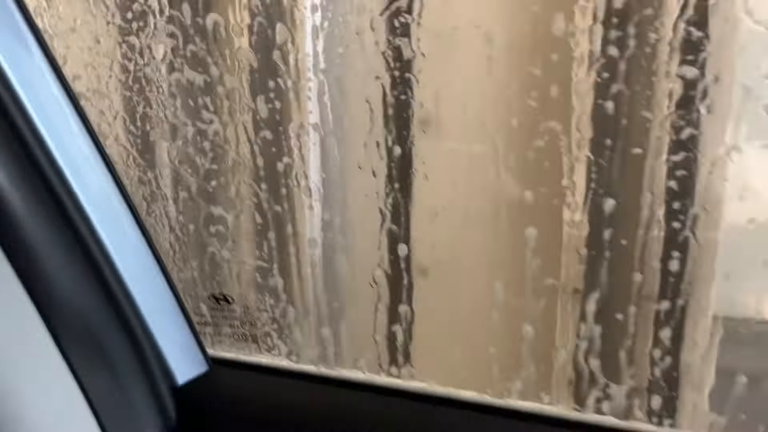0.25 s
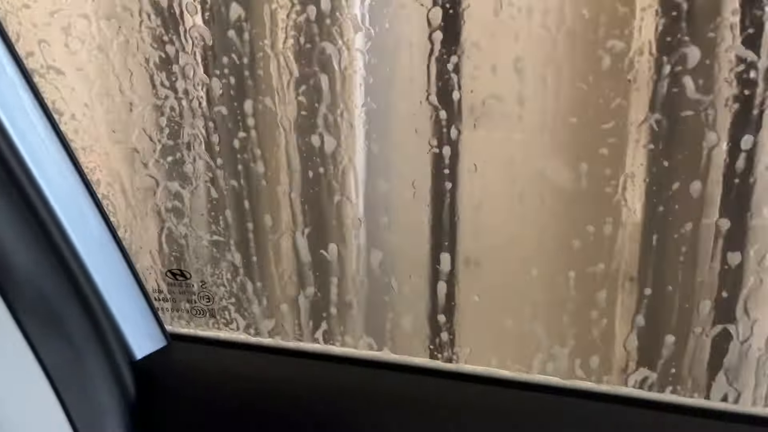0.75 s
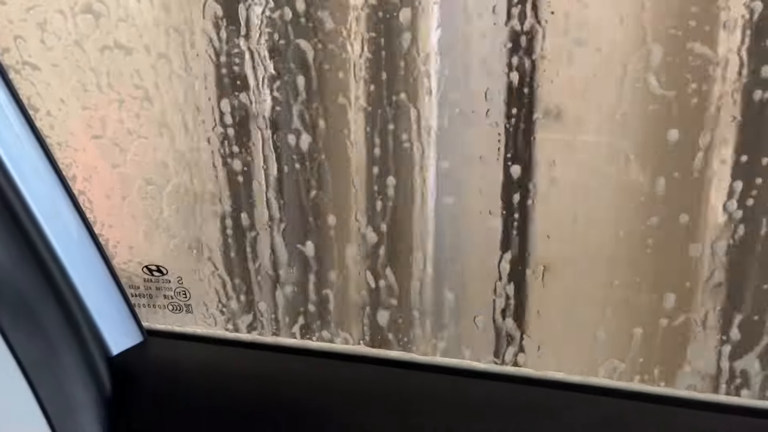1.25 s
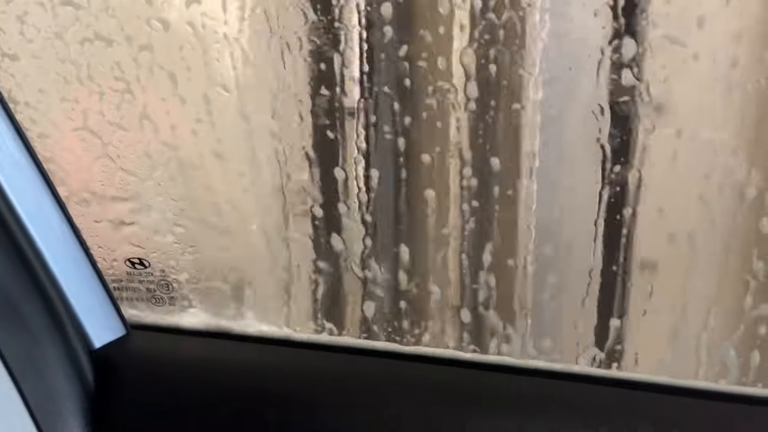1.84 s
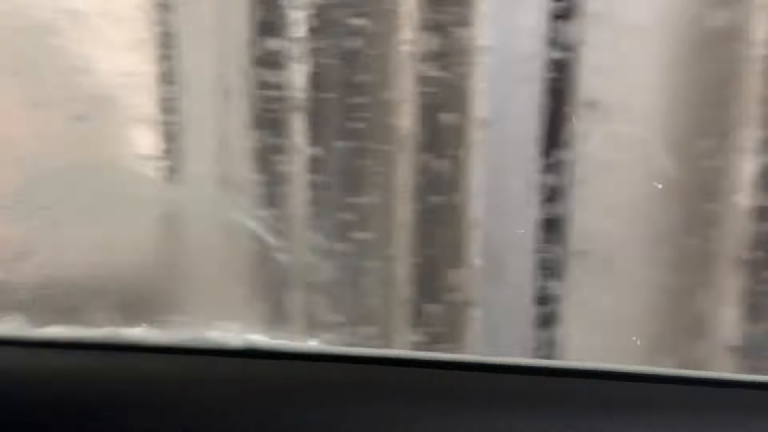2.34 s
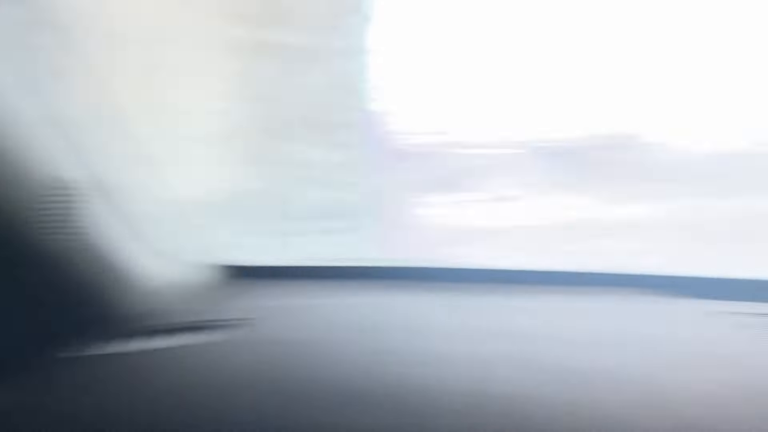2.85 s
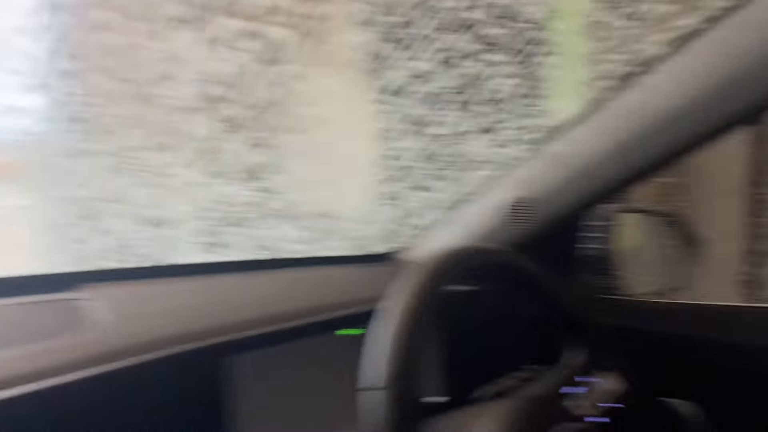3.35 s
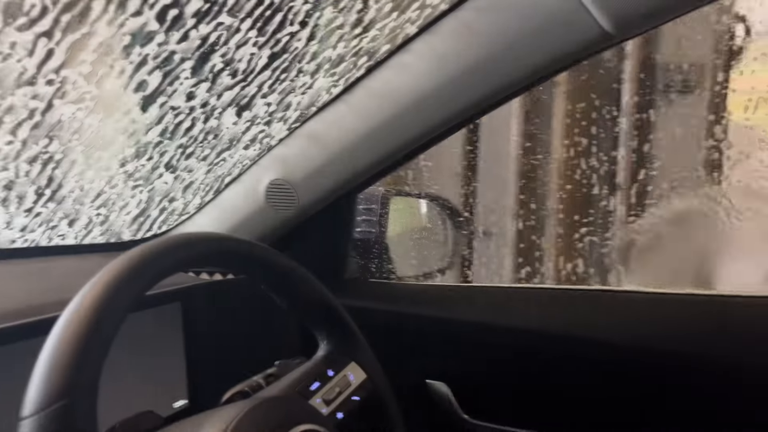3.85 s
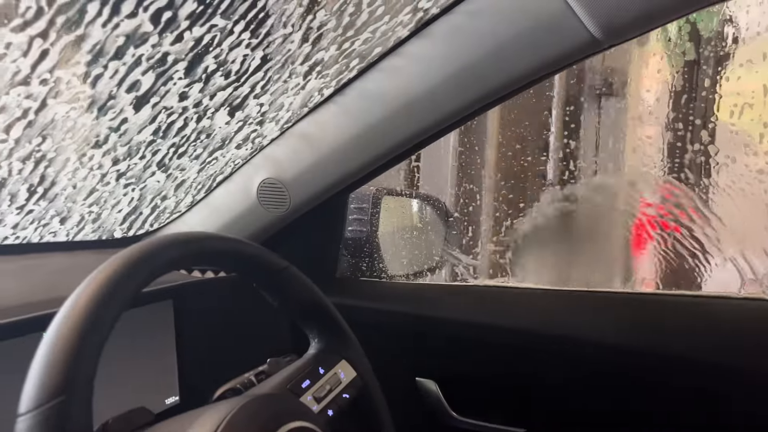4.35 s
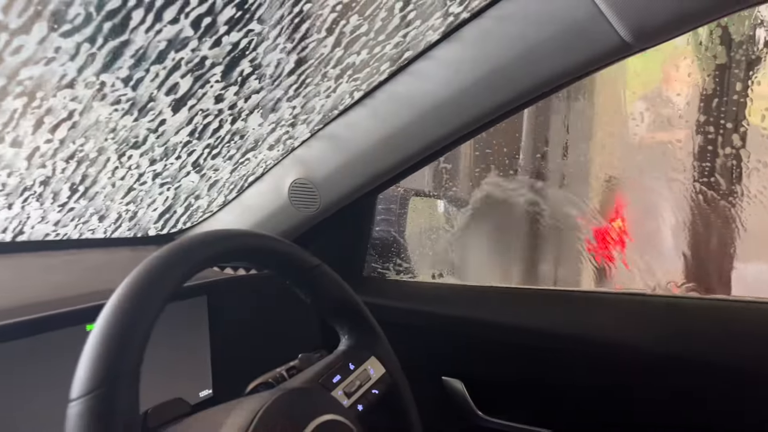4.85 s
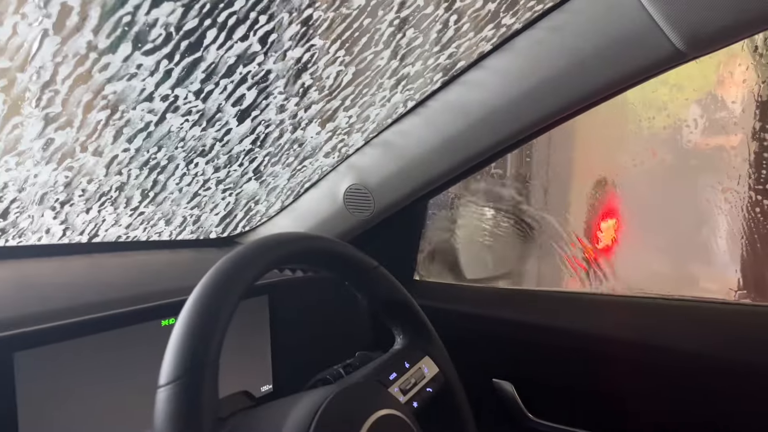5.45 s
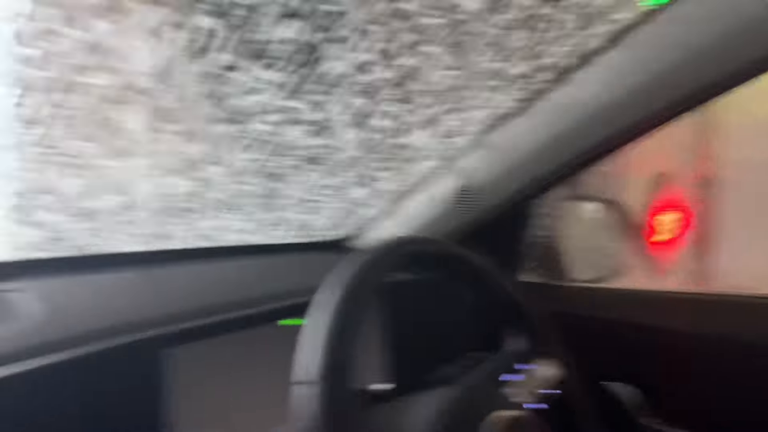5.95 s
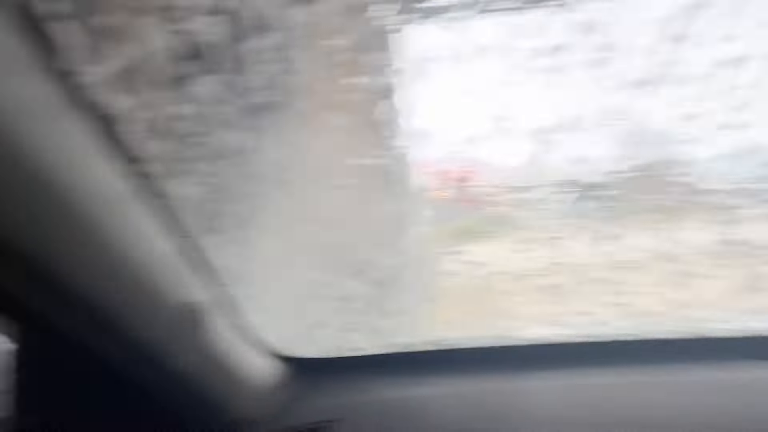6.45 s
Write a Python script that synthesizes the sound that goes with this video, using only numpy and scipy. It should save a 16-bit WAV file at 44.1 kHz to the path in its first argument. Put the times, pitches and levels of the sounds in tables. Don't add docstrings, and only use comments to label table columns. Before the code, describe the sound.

Water jets thud and rumble on car panels over a deep machine hum, spray hisses, a brief rising squeak, then booming hits at the end.

```python
import sys
import numpy as np
from scipy import signal
from scipy.fft import rfft, irfft, next_fast_len
from scipy.io import wavfile
from scipy.ndimage import uniform_filter1d

SR = 44100
rng = np.random.default_rng(int(sys.argv[2]) if len(sys.argv) > 2 else 0)


def voltage_ratio(decibels):
    exponent = np.asarray(decibels, float) / 20
    return 10 ** exponent


def log_audio(samples):
    frames = np.atleast_2d(samples).T
    limited = np.clip(frames, -1, 1)
    pcm = np.round(limited * 32767).astype(np.int16)
    wavfile.write(sys.argv[1], SR, pcm)


N = 294588

PANELS_HZ = [60, 101, 172, 268, 470]


def rms_one(x):
    return x / np.sqrt(np.mean(x ** 2) + 1e-20)


def in_time(rows):
    s, *columns = np.transpose(rows)
    t = np.arange(N) / SR
    return [np.interp(t, s, column) for column in columns]


def drift(rate_hz):
    r = np.exp(-2 * np.pi * rate_hz * 40 / SR)
    noise = rng.standard_normal(N // 40 + 2002)
    slow = signal.lfilter([1], [1, -2 * r, r * r], noise)[2000:]
    return np.interp(np.arange(N) / 40, np.arange(len(slow)), rms_one(slow))


def resonance(x, hz, width_hz):
    r = np.exp(-np.pi * width_hz / SR)
    feed = np.array([1, 0, -1]) * (1 - r * r) / 2
    return signal.lfilter(feed, [1, -2 * r * np.cos(2 * np.pi * hz / SR), r * r], x)


def swells(rows, edge_s):
    s, length, level_db = np.transpose(rows)[:3, :, None]
    t = np.arange(N) / SR
    outside = np.maximum(np.maximum(s - t, t - s - length), 0)
    return voltage_ratio(level_db) * np.exp(-(outside / edge_s) ** 2)


def pitch_shares(hz, at_hz):
    return [np.interp(np.log(hz), np.log(at_hz), one) for one in np.eye(len(at_hz))]


def water(excite, colour, levels_db, at_hz, patchy_db, flicker_hz, count):
    hz, colour_db = np.transpose(colour)
    edges = np.geomspace(hz[0], hz[-1], count + 1)
    together = drift(flicker_hz)
    out = 0
    for k, (low, high) in enumerate(zip(edges, edges[1:])):
        centre_hz = np.sqrt(low * high)
        shares = pitch_shares(centre_hz, at_hz)
        swell_db = sum(share * (level - level.mean()) for share, level in zip(shares, levels_db))
        patch_db = patchy_db * (0.5 * together + drift(flicker_hz))
        gain = voltage_ratio(np.interp(np.log(centre_hz), np.log(hz), colour_db) + swell_db + patch_db)
        band = signal.butter(2, [low, high], "band", fs=SR, output="sos")
        out = out + gain * signal.sosfilt(band, excite[k % 2])
    return rms_one(out)


def panel_levels():
    # time in seconds, level in dB.
    gantry = [(0, -50), (1.1, -46), (1.6, -42), (3.4, -42.5), (3.7, -42.5), (5.3, -41.5), (5.9, -58),
              (6.3, -44), (6.68, -48)]
    # time in seconds, force in dB.
    force = [(0, -40.5), (.5, -41.5), (.9, -41.5), (1.3, -37), (1.5, -33.5), (1.75, -40), (1.95, -43),
             (2.3, -41), (2.7, -39.5), (3.1, -45.5), (3.4, -46), (4.3, -48), (5.3, -49.5), (5.6, -46),
             (6.1, -43), (6.68, -36.5)]
    # time in seconds, rise in dB, panel pitch in Hz.
    surges = [(.03, 12, 128), (.09, 7, 268), (.2, 4, 250), (.41, 6, 104), (.7, 6.5, 430), (1.25, 3, 101),
              (1.3, 1.5, 330), (1.37, 6.5, 290), (1.46, 5, 150), (1.54, 11, 80), (1.59, 6.5, 250),
              (1.75, 5.5, 268), (1.82, 0, 110), (2.03, 16, 131), (2.321, 14, 166), (2.5, 5.5, 165),
              (2.66, 5, 101), (3.54, 6, 101), (3.79, 7, 101), (4.03, 5, 65), (4.5, 3, 268), (4.67, 5, 101),
              (5.04, 11, 101), (5.3, 11, 70), (5.53, 11, 65), (6.2, 5, 360), (6.17, 2.5, 101),
              (6.32, 0, 120)]
    # start in seconds, length in seconds, rise in dB.
    glass_wet = (0.53, 1.65, 9.3)
    surge_s = 0.054

    force_db, = in_time(force)
    force_db = force_db - force_db.mean()
    follow = [0.25, 1.12, 0.44, 0.63]
    panels = np.array(in_time(gantry) + [share * force_db for share in follow])

    wet_start, wet_length, wet_rise_db = glass_wet
    wet_db = wet_rise_db * swells([(wet_start, wet_length, 0)], edge_s=0.1)[0]
    panels[3:] += [0.26 * wet_db, wet_db]

    t = np.arange(N) / SR
    for s, rise_db, hz in surges:
        surge_db = rise_db * np.exp(-((t - s) / surge_s) ** 2)
        panels += np.outer(pitch_shares(hz, PANELS_HZ), surge_db)
    return list(panels)


def drumming():
    # frequency in Hz, level in dB per Hz.
    drum_colour = [(24, -38), (35, -14.5), (50, 0), (100, 5), (140, 2.5), (176, -1.5), (210, -7),
                   (250, -2.5), (320, -7.5), (385, -12.5), (430, -14.5), (470, -26)]
    drum_db, glass_db = -32.5, -53 - 7.5
    glass_hz, glass_width_hz = 429.3, 25.6

    panels = panel_levels()
    noise = rng.standard_normal((2, 2, N))
    body = water(noise, drum_colour, panels, PANELS_HZ, patchy_db=0.5, flicker_hz=9.5, count=24)
    body = signal.sosfilt(signal.butter(6, 480, fs=SR, output="sos"), body)
    glass = resonance(noise[0], glass_hz, glass_width_hz)
    glass = resonance(glass, glass_hz, glass_width_hz)
    return voltage_ratio(drum_db) * body + voltage_ratio(glass_db + panels[-1]) * rms_one(glass)


def cabin(fields):
    out = fields.copy()
    for lag in rng.integers(40, 600, 8):
        out[:, lag:] += 0.09 * drift(1.0)[lag:] * fields[:, :-lag]
    return rms_one(out)


def spray():
    # time in seconds, level in dB, fine mist in dB, coarse drops in dB.
    spray_curve = [(0, -51, -6.5, 0), (.2, -53.5, -7, -1), (.42, -58.5, -8.5, -4), (1.28, -57.5, -11.5, -5),
                   (1.6, -56.5, -5, -5), (1.95, -55, -6.5, -3), (2.38, -51.5, -7, -0.5),
                   (2.52, -43, -8.5, 0), (2.62, -44, -5, -1), (2.86, -47.5, -8.5, 0), (3.02, -52, -6.5, -1),
                   (3.17, -49, -7.5, -2.5), (3.4, -58.5, -8, -4.5), (5.1, -58.5, -7, -4),
                   (5.5, -56.5, -10, -1.5), (5.82, -61, -10, -3.5), (6.42, -52.5, -6.5, -0.5),
                   (6.68, -55, -7, -2)]
    spray_at_hz = [600, 1250, 3800, 11000]
    # frequency in Hz, level in dB per Hz.
    spray_colour = [(400, -5.5), (550, 0), (750, -5), (1000, -9), (1350, -8.5), (1700, -13), (2300, -15.5),
                    (3000, -14.5), (4300, -11.5), (5500, -15), (7000, -19), (8500, -20.5), (11500, -23.5),
                    (16000, -26.5)]
    drops_per_s, spray_db = 3000, -46

    size_db = 3.0 * np.minimum(rng.exponential(1, N), 4)
    drops = voltage_ratio(size_db) * (rng.random(N) < drops_per_s / SR)
    excite = rng.standard_normal((2, 2, N)) * (1 + 0.14 * drops)
    level_db, fine_db, coarse_db = in_time(spray_curve)
    wash_db = 0.61 * level_db + 0.13 * panel_levels()[-1]
    layers = [wash_db, level_db + coarse_db, level_db, level_db + fine_db]
    hiss = water(excite, spray_colour, layers, spray_at_hz, patchy_db=0.9, flicker_hz=10.8, count=20)
    return voltage_ratio(spray_db) * cabin(hiss)


def ports(fields):
    # frequency in Hz, likeness from 0 to 1, right's lead in radians,
    # left over right in dB.
    port_curve = [(30, .98, -.04, 1), (90, 0.95, 0.2, -0.2), (150, 0.93, 0.1, 2.5), (300, 0.85, 0.5, 3.4),
                  (600, 0.41, -0.5, 1), (1000, 0.26, -1, 0.5), (1450, 0.7, -2, -3), (1800, 0, -0.94, 2),
                  (2670, .45, -0.7, 0.5), (4100, 0.29, -1, 2), (5360, 0.42, 2, 3.5), (6480, 0.44, 1, 1),
                  (8600, 0.76, 3.5, -1.5), (11960, 0.83, 6.5, 1.5), (15500, .85, 9.5, -1)]
    hz, alike, lead, pan_db = np.transpose(port_curve)
    size = next_fast_len(N)
    bins = np.arange(size // 2 + 1) * SR / size
    alike = np.interp(bins, hz, np.clip(alike, 0, 1))
    lead = np.interp(bins, hz, lead)
    pan_db = np.interp(bins, hz, pan_db)
    first, second = rfft(fields, size)
    right = alike * np.exp(1j * lead) * first + np.sqrt(1 - alike * alike) * second
    return irfft([first * voltage_ratio(pan_db / 2), right * voltage_ratio(-pan_db / 2)], size)[:, :N]


def pump():
    # multiple of the turning rate, level in dB by the side window,
    # in dB by the windscreen, in dB in mid cabin, left over right in dB.
    orders = [(1, 2.5, -15.5, -13.5, 0), (2, -1, -1, 1, -0.5), (3, -8.5, -15, -16.5, 6),
              (4, -18.5, -21.5, -11, -1), (5, -28, -6, -27.5, 2), (6, -25, -52, -48, 0),
              (7, -41, -17.5, -29.5, -2)]
    # time in seconds, level in dB,
    # microphone place (0 side window, 1 windscreen, 2 mid cabin).
    hum = [(0, -33, 0.3), (.3, -34.5, -0.04), (.7, -36, .2), (1, -34, 0), (1.5, -31.5, -0.5),
           (2, -33, -0.02), (2.5, -29.5, 0.3), (2.8, -34, 0.1), (3.15, -41.5, 1), (3.35, -40, 1.5),
           (3.5, -36.5, 2.3), (4.1, -37, 1.5), (4.7, -34.5, 2), (5.3, -36, 4), (5.8, -34, 3),
           (6.2, -39, 1.7), (6.68, -45, 0.8)]
    pump_hz = 72.46

    level_db, place = in_time(hum)
    turn = 2 * np.pi * pump_hz * np.arange(N) / SR
    beside_window = np.clip(1 - place, 0, 1)
    out = 0
    for k, *places_db, pan_db in orders:
        order_db = level_db + np.interp(place, range(3), places_db) + 1.0 * drift(1.12)
        tone = np.sqrt(2) * np.cos(round(k) * turn + 0.07 * drift(5.4))
        pan = pan_db * beside_window / 2 * np.array([[1], [-1]])
        out = out + voltage_ratio(order_db + pan) * tone
    return out


def pane():
    # start in seconds, length in seconds, level in dB,
    # right port's share (-1 opposite, 1 in phase).
    rings = [
        (0, .15, -60, -1.01),
        (.55, 0.25, -62, -1.3),
        (1.8, 0.4, -51.5, -0.82),
        (3.035, 0.24, -58, 0.95),
        (6.4, .3, -69, -1.01),
    ]
    pane_hz, width_hz = 1313, 97

    gains = swells(rings, edge_s=0.065)
    ringing = resonance(rng.standard_normal(N), pane_hz, width_hz)
    ringing = resonance(ringing, pane_hz, width_hz)
    left = 0.84 * gains.sum(axis=0)
    right = np.transpose(rings)[3] @ gains
    return rms_one(ringing) * [left, right]


def whistle():
    # start in seconds, length in seconds, level in dB.
    puffs = [
        (2.425, 0.024, -46),
        (2.478, 0.017, -42),
        (2.515, .01, -47),
        (2.56, 0.029, -40.5),
    ]
    from_s, from_hz, rise_hz_per_s = 2.43, 585, 1500

    t = np.arange(N) / SR
    hz = np.clip(from_hz + rise_hz_per_s * (t - from_s), 100, 2000)
    tone = np.sin(2 * np.pi * np.cumsum(hz * (1 + 0.02 * drift(47))) / SR)
    gain = swells(puffs, edge_s=0.012).sum(axis=0) * voltage_ratio(2.5 * drift(35))
    return np.sqrt(2) * gain * tone


def ticks():
    # time in seconds, peak in dB, pitch in Hz.
    clicks = [
        (2.512, -24.5, 1000),
        (3.460, -34, 950),
    ]
    out = np.zeros(N)
    t = np.arange(400) / SR
    for s, peak_db, hz in clicks:
        start = round(s * SR)
        out[start:start + len(t)] += voltage_ratio(peak_db) * np.exp(-t / 0.0013) * np.sin(2 * np.pi * hz * t)
    return out


def boom():
    # start in seconds, length in seconds, level in dB.
    hits = [
        (6.2, 0.064, -42),
        (6.305, 0.017, -33),
        (6.485, .02, -27.5),
        (6.6, .1, -27),
    ]
    boom_hz = 176
    tone = np.sin(2 * np.pi * np.cumsum(boom_hz * (1 + 0.014 * drift(5.3))) / SR)
    gain = swells(hits, edge_s=0.018).sum(axis=0)
    return np.sqrt(2) * gain * tone * voltage_ratio([[1.2], [-1.2]])


def scene():
    diffuse = ports(drumming() + spray())
    return diffuse + pump() + pane() + whistle() + ticks() + boom()


def drop_bands(x, gaps):
    spectrum = rfft(x)
    bins = np.arange(N // 2 + 1) * SR / N
    for low, high, fringe in gaps:
        now_and_then = uniform_filter1d(1. * (drift(8) > 1), size=300)
        x = x - irfft(spectrum * (bins > low) * (bins < high), N)
        x = x - (1 - now_and_then) * irfft(spectrum * (bins > fringe) * (bins <= low), N)
    return x


def band_limit(x):
    return signal.sosfilt(signal.butter(12, 15750, fs=SR, output="sos"), x)


def record(dry):
    # low edge in Hz, high edge in Hz, ragged lower fringe in Hz.
    mid_gaps = [(8250, 8900, 7720), (14450, 22000, 14350)]
    # low edge in Hz, high edge in Hz, lower fringe in Hz.
    side_gaps = [(11150, 13050, 11000)]
    mid = drop_bands(dry[0] + dry[1], mid_gaps) / 2
    side = drop_bands(dry[0] - dry[1], side_gaps) / 2
    return band_limit(np.array([mid + side, mid - side]))


dry = scene()
out = record(dry)
log_audio(out)
```